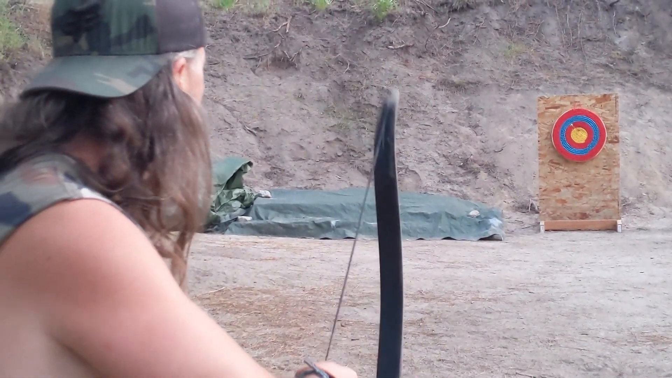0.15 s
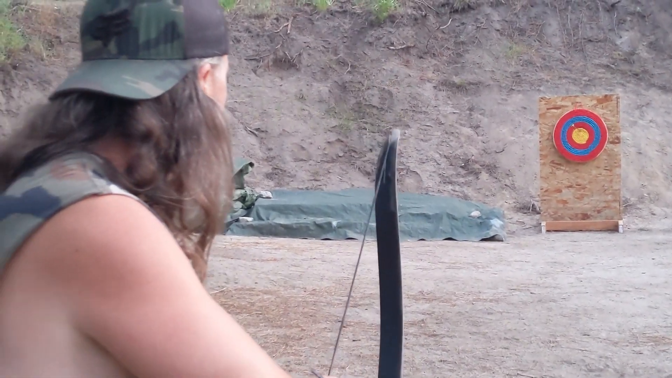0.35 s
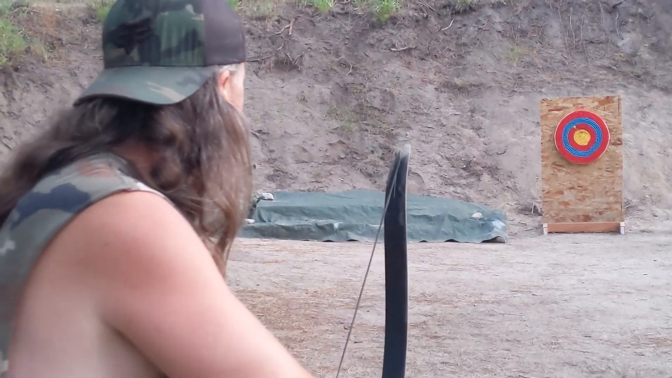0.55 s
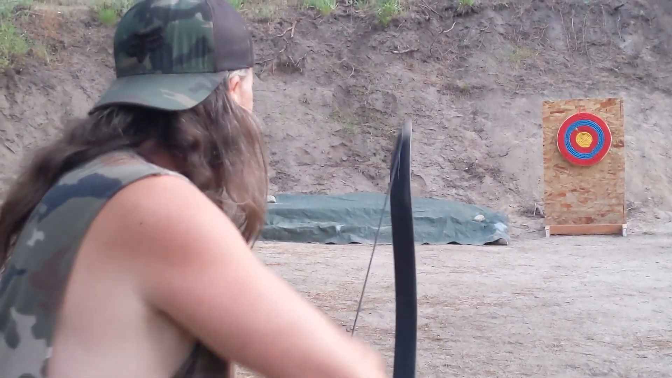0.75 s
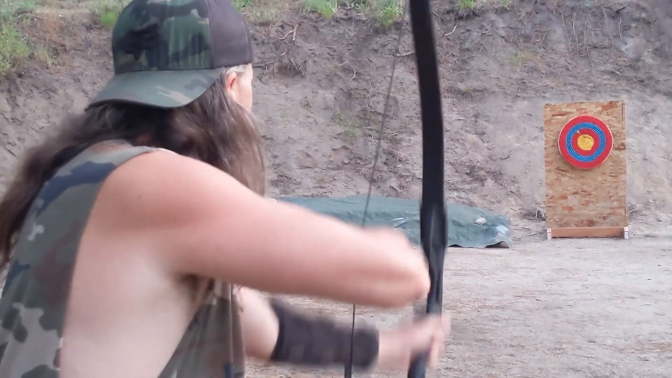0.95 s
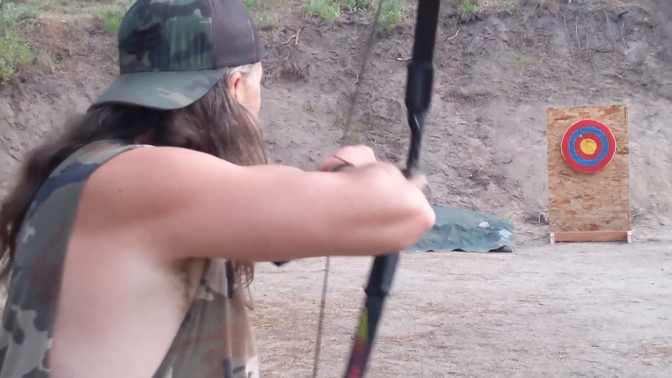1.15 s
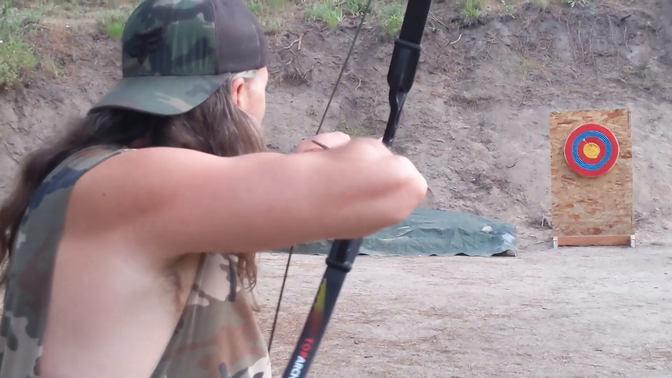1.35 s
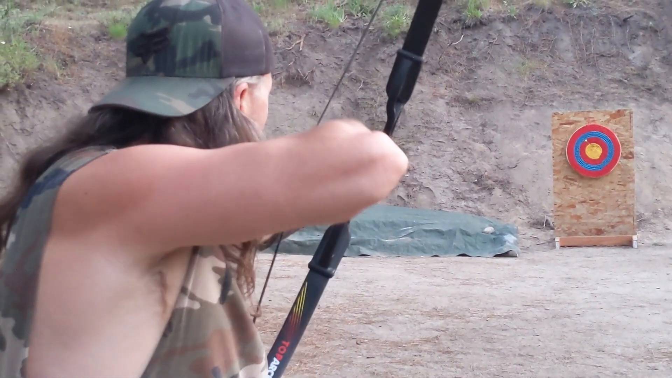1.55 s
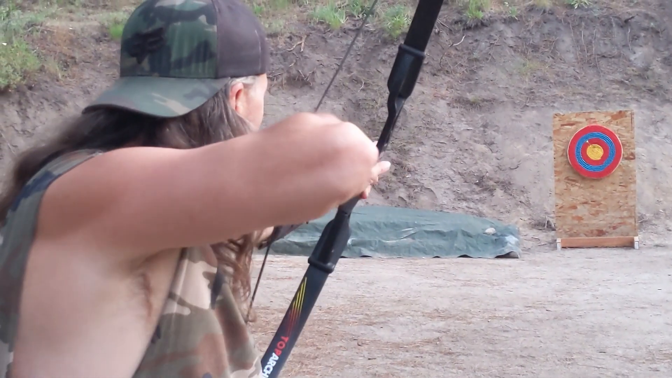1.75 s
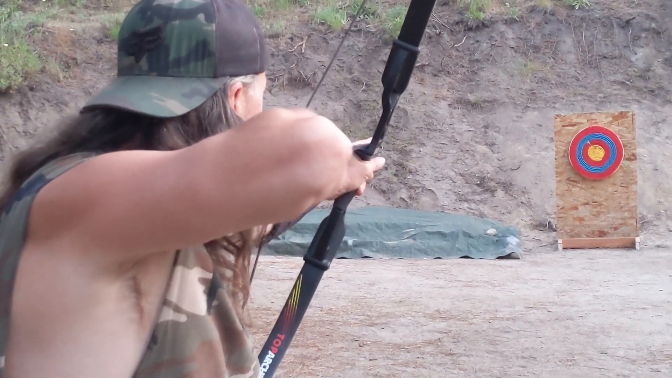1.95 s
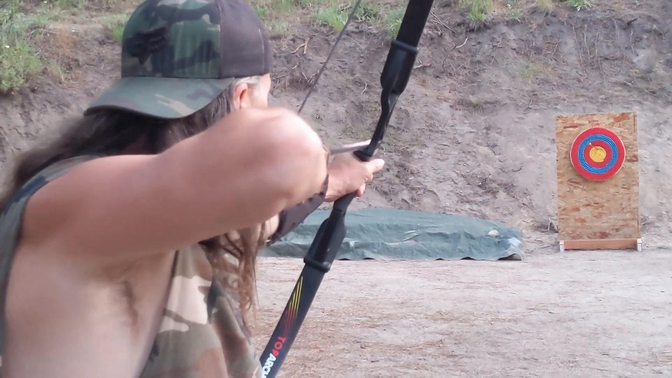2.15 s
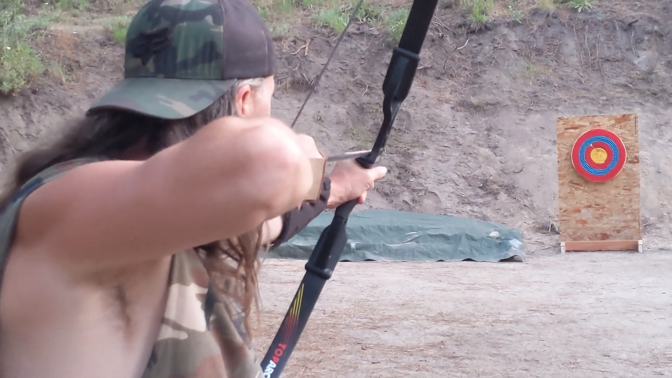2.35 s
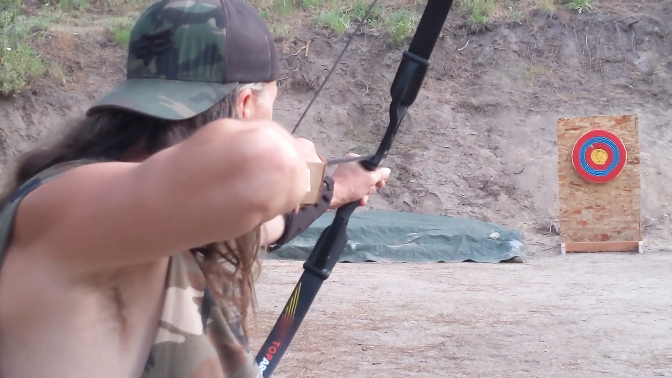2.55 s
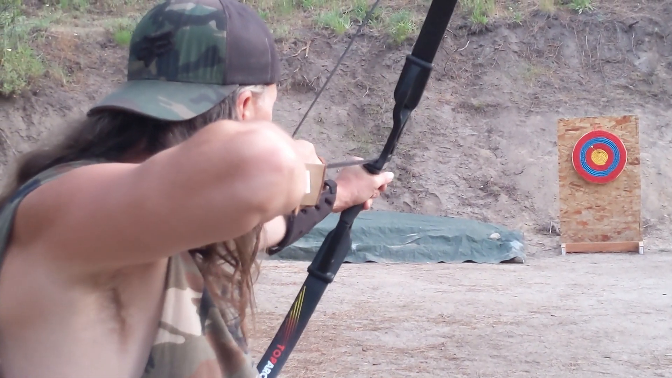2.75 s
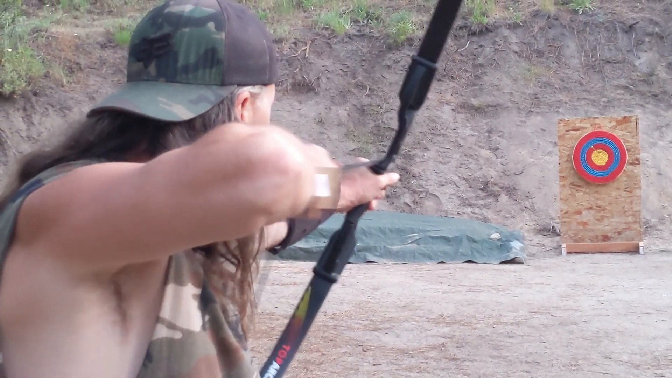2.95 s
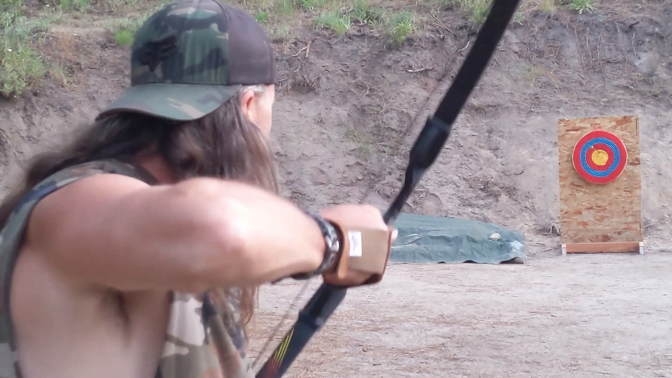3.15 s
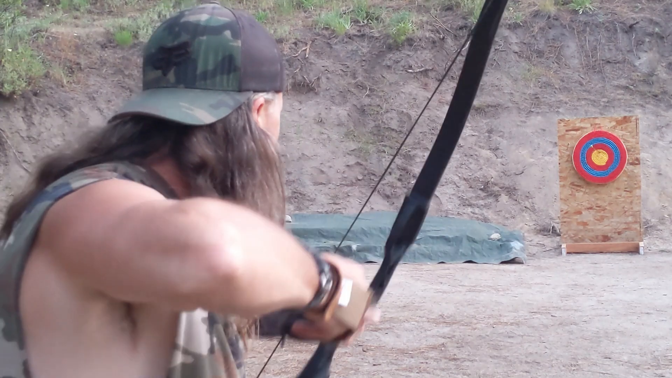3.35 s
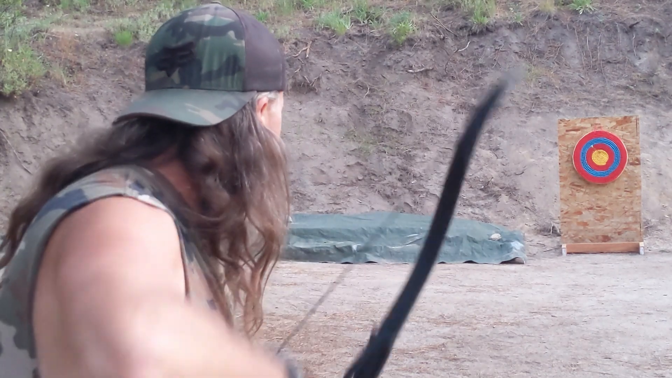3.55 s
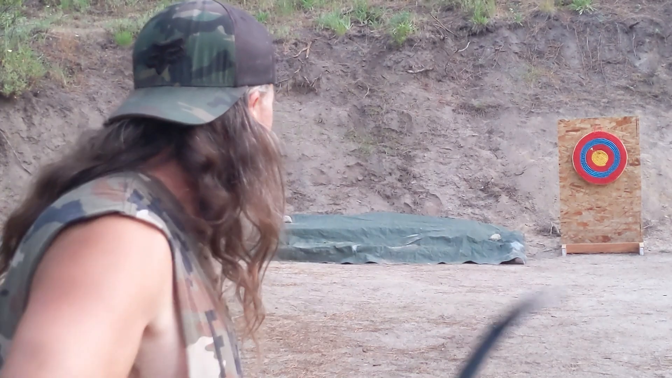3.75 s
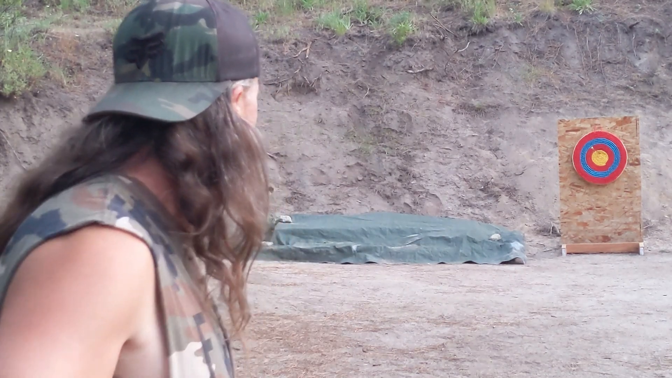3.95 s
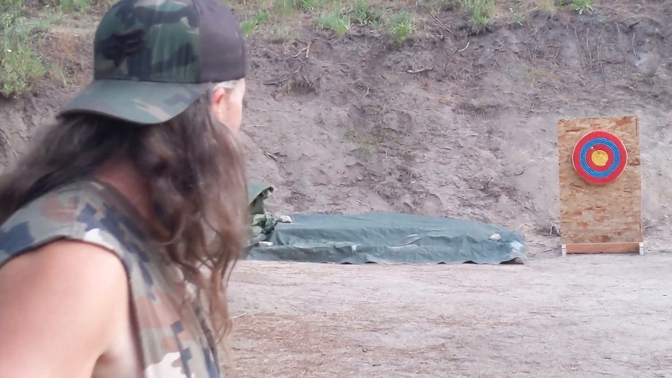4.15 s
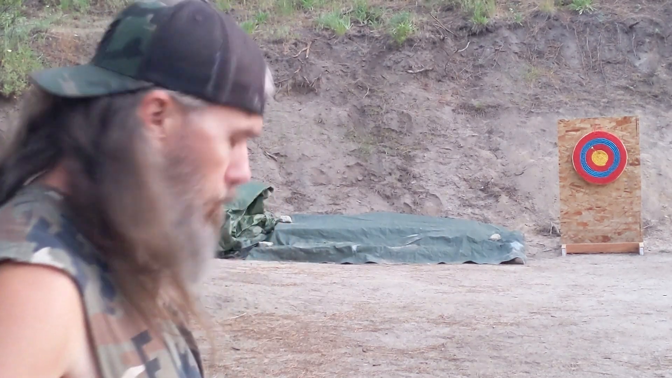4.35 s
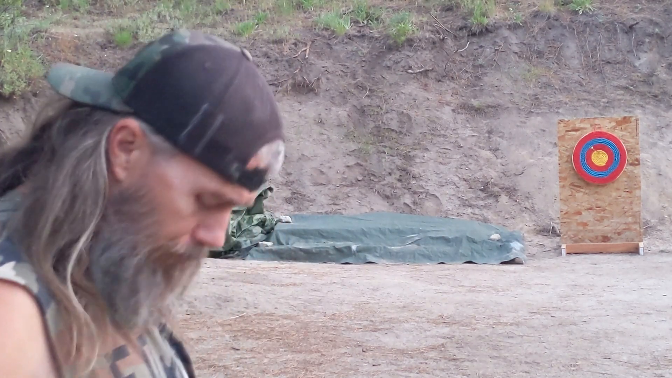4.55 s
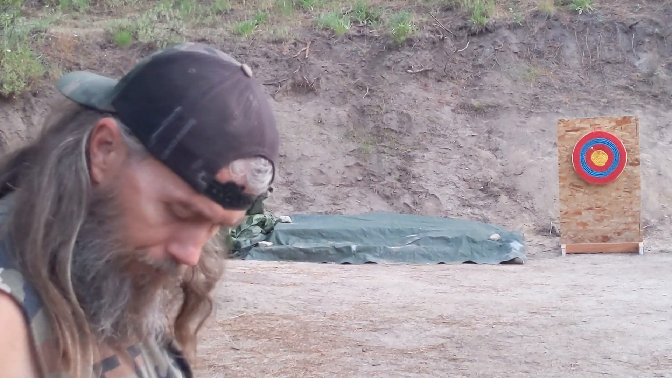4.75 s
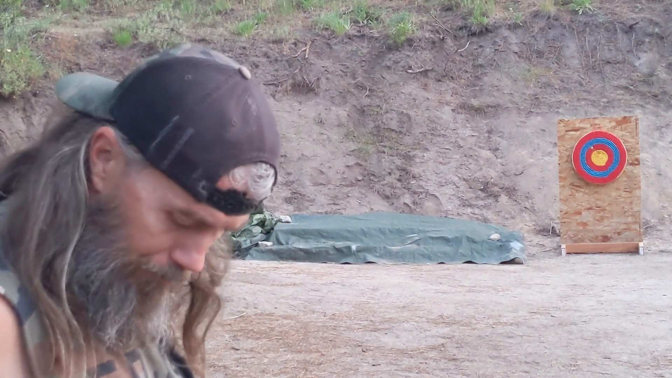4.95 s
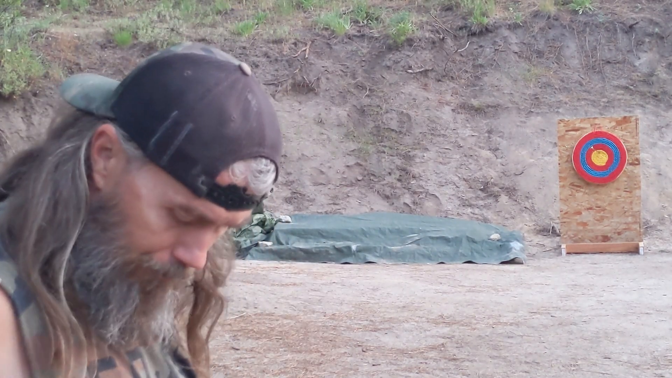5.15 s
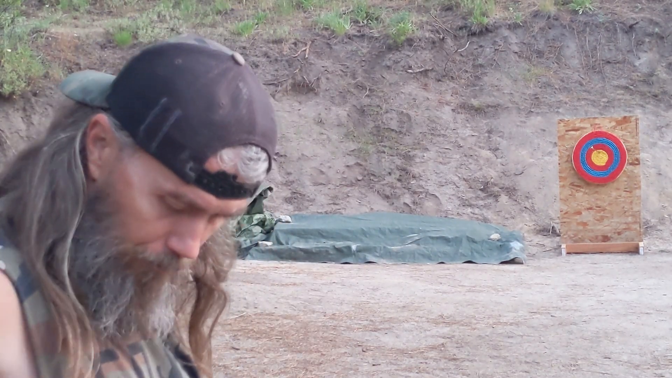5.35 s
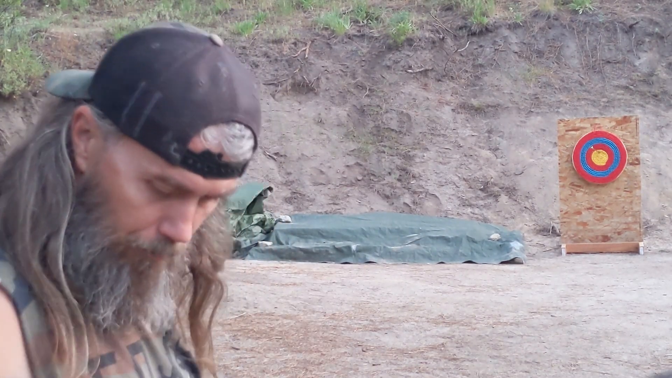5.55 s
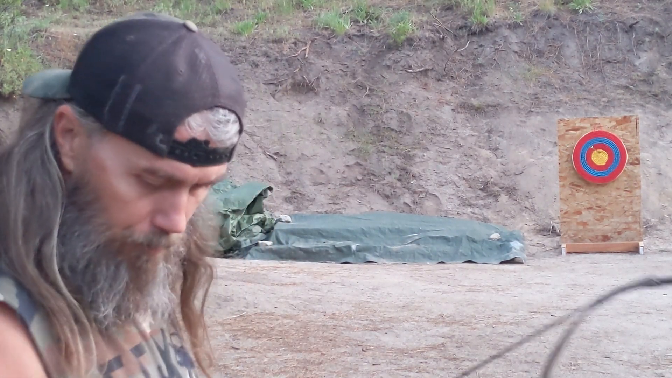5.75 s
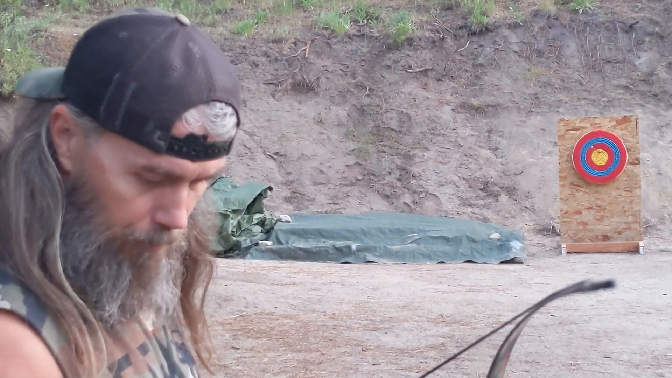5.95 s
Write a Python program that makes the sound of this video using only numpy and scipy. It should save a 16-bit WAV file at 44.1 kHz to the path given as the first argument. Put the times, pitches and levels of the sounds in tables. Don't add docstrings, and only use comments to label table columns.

```python
import sys
import numpy as np
from scipy import signal
from scipy.fft import rfft, irfft
from scipy.io import wavfile
from scipy.ndimage import uniform_filter1d, map_coordinates

SR = 44100
rng = np.random.default_rng(int(sys.argv[2]) if len(sys.argv) > 2 else 0)


def ratio(d):
    e = np.asarray(d, float) / 20
    return 10 ** e


def generate_wav(sig):
    pcm = np.round(np.clip(np.atleast_2d(sig).T, -1, 1) * 32767).astype(np.int16)
    wavfile.write(sys.argv[1], SR, pcm)


N = 264159
T, HZ = np.arange(N) / SR, np.fft.rfftfreq(N, 1 / SR)


def colour(x, points):
    hz, db = np.transpose(points)
    return irfft(rfft(x) * ratio(np.interp(np.log(HZ + 1), np.log(hz), db)), N)


def level(x, db):
    return x * ratio(db) / np.sqrt(np.mean(x ** 2))


def ring(x, hz, t60):
    pole = np.exp((2j * np.pi * hz - np.log(1000) / t60) / SR)
    return signal.lfilter([1], [1, -pole], x).imag


def band(x, hz, width):
    return ring(x, hz, np.log(1000) / (np.pi * width))


def clicks(s, size):
    return np.bincount(np.int_(np.asarray(s) * SR), size, N)


def walk(rate):
    hold = int(SR / rate)
    steps = np.repeat(rng.standard_normal(N // hold + 1), hold)
    return 1.07 * uniform_filter1d(uniform_filter1d(steps, hold), hold)[:N]


def noise(alike_hz):
    both, own = rfft(rng.standard_normal(N)), rfft(rng.standard_normal((2, N)))
    share = 1 / (1 + (HZ / alike_hz) ** 2)
    return irfft(np.sqrt(share) * both + np.sqrt(1 - share) * own, N)


def whistle(s, length, hz0, hz1, hz2, db):
    u = np.arange(int(length * SR)) / (length * SR)
    bend = np.polyfit([0, .5, 1], np.log([hz0, hz1, hz2]), deg=2)
    hz = np.exp(np.polyval(bend, u))
    envelope = np.clip(2.0 * np.sin(np.pi * u), 0, 1) ** 0.78
    tone = ratio(db) * envelope * np.sin(2 * np.pi * np.cumsum(hz) / SR)
    return np.pad(tone, (int(s * SR), N))[:N]


def swells(rows, rest_db):
    power = ratio(2 * rest_db)
    for s, length, db in rows:
        power = power + ratio(2 * db) * np.cos(np.pi * np.clip((T - s) / length, -.5, .5)) ** 2
    return np.sqrt(power)


# f/Hz, left minus right level/dB
SHADE = [(60, 1.5), (110, 1.5), (200, 2.5), (380, 4.5), (700, 5.0), (1290, 7.5), (2380, 7.5), (4400, 9.0),
         (8120, 8.0), (15000, 5.0)]
# f/Hz, phase/rad
PORT_LAG = [(20, .4), (60, .45), (130, .7), (240, 1.0), (400, 1.5), (740, 1.0), (1300, .4), (2200, .6),
            (3700, 2.5), (16000, 8.0)]


def ports(x, shade):
    left, right = x * np.ones((2, 1))
    half = np.array(SHADE) * [1, shade / 2]
    lag = np.interp(HZ, *np.transpose(PORT_LAG))
    late = irfft(rfft(left) * np.exp(-1j * lag), N)
    return np.array([colour(late, half), colour(right, half * [1, -1])])


# f/Hz, level per Hz/dB
WIND = [(13, -31), (22, 3.5), (39, -1.5), (134, -11), (161, -15.5), (200, -17.5), (285, -29.5), (400, -33),
        (520, -61.5), (880, -120)]
# t/s, rumble level/dB
GUSTS = [(0, -59.5), (.6, -59), (1.2, -59), (1.55, -60.5), (1.75, -58), (2.05, -59.5), (2.45, -62.5),
         (2.9, -58), (3.3, -59.5), (3.75, -62), (4.3, -62.5), (4.7, -63), (5.0, -62.5), (5.15, -58),
         (5.4, -64.5), (5.8, -59.5), (5.99, -64)]


def wind():
    rumble = level(colour(noise(270.0), WIND), 0.45)
    return rumble * ratio(np.interp(T, *np.transpose(GUSTS)) + 1.5 * walk(6.7))


# f/Hz, level per Hz/dB
FLOOR = [(150, -33), (260, -3.5), (450, -6.5), (1400, -14.5), (2000, -17.5), (3300, -12.5), (4600, -14),
         (5600, -12.5), (6500, -16.5), (7500, -12), (8500, -17), (9600, -18), (13000, -22.5), (15600, -18)]


def far_hiss():
    return level(colour(noise(630.0), FLOOR), -71.5) * ratio(0.18 * walk(5.9))


# middle t/s, length/s, peak level/dB
INSECTS = [(1.4, 0.76, -73), (1.9, 0.32, -76), (2.18, .3, -80), (2.85, 0.72, -85), (3.9, 0.72, -87),
           (5.2, .5, -84)]


def insects():
    chorus = level(band(band(noise(900.), 7500., 1300.), 7500., 1300.), .3)
    return chorus * swells(INSECTS, rest_db=-89.5) * ratio(2.5 * walk(30) + 2.0 * walk(9))


# f/Hz, width/Hz, level/dB
RUSTLE = [(2500, 400, -13.5), (3300, 900, -2.5), (4120, 550, -6.5), (5630, 620, 0.5), (6600, 1100, -3.5),
          (9400, 1000, 1), (11600, 830, -4.5), (14400, 2700, -7.5)]
# middle t/s, length/s, peak level/dB
CLOTH = [(.35, 0.27, -85), (.98, 0.76, -77), (1.45, .5, -83), (2.15, .4, -88.5), (3.05, 0.36, -81),
         (4.53, 0.26, -82.5), (5.15, .2, -80.5), (5.3, 0.26, -83)]


def cloth():
    rustle = 0
    for hz, width, db in RUSTLE:
        rustle += level(band(noise(830.0), hz, width), db) * ratio(3.4 * walk(14) + 1.5 * walk(300))
    return rustle * swells(CLOTH, rest_db=-87)


def creak():
    tone = level(band(rng.standard_normal(N), 141.4, 4.7), -67.5)
    return tone * np.interp(T, [2.62, 2.72, 2.93, 2.98], [0, 1, 1, 0])


def air():
    return ports(wind() + far_hiss() + insects() + cloth() + creak(), shade=0.58)


# first note t/s, gap/s, peak level/dB, fade to the last note/dB
TRILL = [
    (.1478, .058, -67, 3),
    (4.4955, .0588, -62.5, 7.5),
]


def trills():
    notes, loudest = 12, 5
    k = np.arange(notes)
    arch = np.interp(k, [0, loudest, k[-1]], [1, 0, 1]) ** 2
    out = 0
    for first, gap, peak_db, fade_db in TRILL:
        arch_db = arch * np.where(k < loudest, 2, fade_db)
        db = peak_db - arch_db + .6 * rng.standard_normal(notes)
        pitch = 1 + 0.0071 * rng.standard_normal(notes)
        for s, p, note_db in zip(first + gap * k, pitch, db):
            out += whistle(s - .003, 0.021, 4770 * p, 4400 * p, 3808 * p, note_db)
    return out


NOTES = {"held": [(.025, 0.08, 3510, -65.5), (4.38, 0.073, 3510, -65.5)], "sag": [(4.808, .055, 4040, -57)],
         "fall": [(1.06, .04, 4350, -75), (1.27, 0.058, 4480, -74), (1.495, .045, 4500, -72),
         (2.0, 0.042, 3720, -70.5)], "drop": [(1.362, .02, 5100, -68.5), (2.15, .045, 3460, -79.5),
         (4.852, 0.015, 3460, -74)], "swoop": [(1.712, 0.08, 4870, -66), (1.878, .07, 4860, -64),
         (2.345, .06, 3800, -78)], "arch": [(1.112, .04, 5820, -67.5), (1.56, .04, 5720, -63.5)],
         "lift": [(2.305, 0.044, 5170, -69.5), (4.845, .025, 2910, -75)], "rise": [(1.33, .02, 4530, -71),
         (2.04, 0.048, 4120, -74)]}
SHAPES = {"held": (.995, .99), "sag": (1.037, .963), "fall": (1.07, .84), "drop": (1.16, .81),
          "swoop": (1.44, .91), "arch": (.78, .86), "lift": (.965, 1.035), "rise": (.84, 1.28)}


def near_birds():
    near = trills()
    for shape, (start, end) in SHAPES.items():
        for s, length, hz, db in NOTES[shape]:
            near += whistle(s, length, start * hz, hz, end * hz, db)
    delay_s = 3e-5 * walk(150)
    return map_coordinates(near, [(T + delay_s) * SR])


# call rate/(1/s), chips a call, f/Hz, share heard direct
CHATTER = [(17.1, 3, 5800, .8), (26.2, 1, 5700, .75), (23.1, 1, 3900, .7), (23.1, 1, 5050, .5),
           (14, 3, 5600, .5), (30, 3, 5600, .1), (20, 2, 5600, 1), (26.2, 3, 3600, .6), (30, 3, 3300, .2),
           (30, 3, 4100, .3), (20, 3, 3800, .7)]
# start t/s, end t/s, first level/dB, last level/dB
BOUTS = [(4.462, 5.1, -68, -71.5), (5.114, 5.6, -67.5, -68), (2.866, 3.42, -67, -67),
         (2.9, 3.42, -73, -73.5), (.8, 1.08, -70, -71), (2.06, 2.55, -73, -75), (1.34, 1.35, -63, -64),
         (4.88, 5.55, -65, -73.5), (1.97, 2.06, -70, -76), (2.22, 2.28, -70.5, -74.5),
         (2.836, 2.84, -67, -67)]


def chatter():
    direct, far = 0, 0
    for (rate, chips, hz, share), (s0, s1, *ends_db) in zip(CHATTER, BOUTS):
        starts = np.arange(s0, s1, 1 / rate)
        scatter = rng.standard_normal((2, len(starts), 3))
        db = np.interp(starts, [s0, s1], ends_db)[:, None] + 1.504 * scatter[0]
        pitch = hz * (1 + .06 * (1.1 - share) * scatter[1])
        calls = 0
        for s, row, f in zip(starts, db, pitch):
            for k in range(chips):
                calls += whistle(s + .0095 * k, .006, 1.09 * f[k], f[k], .92 * f[k], row[k])
        direct = direct + share * calls
        far = far + (1.2 - share) * calls
    return direct, far


def birds():
    near = near_birds()
    direct, far = chatter()
    t = T[:SR // 2]
    echo = 0
    for x, t60, loss_db in ((near, .8, 43), (far, .35, 31)):
        leaves = rng.standard_normal(len(t)) * ratio(-60 * t / t60 - loss_db)
        echo += signal.fftconvolve(x, leaves)[:N]
    return ((near + direct) * ratio(2.2 * walk(120)) + echo) * ratio([[3.0], [-9]])


# t/s, motor steps
LENS_RUNS = [
    (.302, 21),
    (1.901, 21),
    (5.101, 21),
]
# f/Hz, width/Hz, level/dB
LENS_BODY = [(6050, 220, -6.5), (7500, 310, 0), (9620, 530, 4.5), (10500, 900, -1), (11200, 1300, -8.5),
             (15340, 500, 1)]


def lens():
    checks = np.arange(.2921, T[-1], .32001)
    settles = np.array([s + .15 for s, _ in LENS_RUNS])
    times = np.r_[checks, settles]
    db = np.r_[-59.5 + 0 * checks, -60 + 0 * settles] + .7 * rng.standard_normal(len(times))
    steps = sum(clicks(times + late, ratio(db)) for late in (0.00033, 0.0038))
    for s, n in LENS_RUNS:
        steps += clicks(s + np.arange(n) / 200, ratio(-61 + 1.2 * rng.standard_normal(n)))
    body = sum(ratio(gain_db) * band(steps, hz, width) for hz, width, gain_db in LENS_BODY)
    return body * ratio([[1.0], [-22]])


# t/s, peak level/dB,
# ring f/Hz, width/Hz, ticks
KNOCKS = [(2.89, -64.5, 714, 150, 2), (3.0, -60.5, 5000, 6000, 2), (3.7916, -42.5, 706, 1000, 1),
          (3.797, -48, 600, 800, 1), (3.791, -40, 2400, 2591, 1), (4.096, -56.5, 2360, 900, 7),
          (4.704, -46.5, 7500, 3000, 2), (5.232, -60, 6900, 901, 2)]


def knocks():
    out = 0
    for s, db, hz, width, ticks in KNOCKS:
        n = round(ticks)
        late, scatter = rng.standard_normal((2, n))
        times = s + 0.0033 * (np.arange(n) + .2 * late)
        out += band(clicks(times, ratio(db + 1.2 * scatter)), hz, width)
    return out


# t/s, scrape level/dB, limb rattle level/dB
SCRAPE = [(3.063, -59, -78), (3.071, -45, -56), (3.085, -40.5, -57), (3.096, -36, -34.5),
          (3.108, -32.5, -25), (3.119, -34.5, -37.5), (3.13, -41.5, -39), (3.15, -52, -49),
          (3.3, -78.5, -78)]
# f/Hz, level per Hz/dB
SCRAPE_TONE = [(1060, -12), (1800, -6.5), (2060, -16.5), (2240, -4), (3110, -5.5), (3460, -1.5),
               (4630, -13.5), (5210, -2), (6310, -11.5), (7640, -8), (8440, -13), (11600, -11.5),
               (15800, -23)]
# f/Hz, level per Hz/dB
RATTLE_TONE = [(88, -36), (150, -6.5), (260, -5.5), (370, 3), (488, -2.5), (866, -0.5), (1150, -18),
               (1400, -8), (2080, -18.5), (2200, -25), (2860, -25), (4840, -120)]
# t/s, peak level/dB, ring f/Hz
CATCH = [(3.0677, -43, 2610), (3.0685, -43.5, 4900), (3.0765, -36, 7700), (3.082, -33.5, 2720),
         (3.0854, -21.5, 7120), (3.0914, -38.5, 5760), (3.0973, -26.5, 1800), (3.1041, -31.5, 2237),
         (3.107, -28.5, 3500), (3.1183, -33.5, 5350), (3.1324, -28.5, 3530), (3.22, -46, 4120)]
# f/Hz, level/dB, t60/s
LIMBS = [(135, -33.5, 0.13), (146, -48, 1.1), (159, -53, 1), (238, -40.5, 0.21), (386, -40, 0.25),
         (414, -49.5, 0.16), (471, -49.5, 0.106), (650, -44, .3), (850, -45, .1)]
# t/s, length/s, start f/Hz, middle f/Hz, end f/Hz, level/dB
TWANG = (3.318, .028, 650, 652, 645, -67)


def release():
    s, scrape_db, rattle_db = np.transpose(SCRAPE)
    on = (T > s[0]) & (T < s[-1])
    grit = ratio(3.0 * walk(500))
    scrape = level(colour(noise(4550.0) * grit, SCRAPE_TONE), -2.43)
    scrape = scrape * ratio(np.interp(T, s, scrape_db)) * on
    rattle = level(colour(noise(4000.), RATTLE_TONE), -1.5)
    rattle = rattle * ratio(np.interp(T, s, rattle_db) + 1.5 * walk(200)) * on
    catches = sum(band(clicks([c], [ratio(db - 0.5)]), hz, 500.) for c, db, hz in CATCH)
    stop = uniform_filter1d(clicks([3.092], [-1.]), size=30)
    limbs = sum(ratio(db) * ring(stop, hz, t60) for hz, db, t60 in LIMBS)
    hum = limbs * ratio(1.5 * walk(30))
    return scrape + rattle + catches + whistle(*TWANG) + hum


# f/Hz, level/dB, t60/s
BANK = [(85, -44, 0.59), (123.6, -40, 0.44), (191.7, -39.5, .4), (328, -53, 0.83), (664, -56, 0.81),
        (1116, -52, 0.55), (1600, -56, .3), (3050, -51, 0.39), (3300, -58.5, 1.07), (3800, -48.5, 0.5),
        (5360, -56, 0.34), (7240, -54, .35), (9800, -58.5, .35), (13530, -64, .3)]


def bank(s, db, lows_late):
    t, out = np.clip(T - s, 0, 9), 0
    for hz, gain_db, t60 in BANK:
        width = 0.37 * hz
        scatter = level(band(band(noise(1500.), hz, width), hz, width), gain_db + db)
        rise = 1 - np.exp(-t / (lows_late / hz))
        grain_db = 1.3 * walk(40) + 2.39 * walk(min(hz / 12, 250))
        out += scatter * rise * ratio(-60 * t / t60 + grain_db)
    return out


# f/Hz, level/dB, t60/s
BOARD = [(198.5, -30, .1), (248.3, -20, 0.053), (364.4, -34.5, 0.11), (465, -39, 0.13), (743, -24.5, 0.055),
         (875, -24, 0.064), (1080, -27.5, .04), (1440, -26, 0.015), (1565, -30.5, 0.0255)]
# delay t/s, level/dB
SLAPS = [(.028, -15.5), (.04, -14.5), (.065, -16.5), (.086, -13.5), (.107, -21.5), (0.129, -24.5),
         (.18, -30)]
# t/s, length/s, start f/Hz, middle f/Hz, end f/Hz, level/dB
SWAY = (3.415, .07, 68, 86, 115, -40)
# f/Hz, level/dB, t60/s
SHAFT = [(2900, -4, .008), (3650, 0, .009), (4500, -8, .008), (5300, -9, .009), (9600, -13, .007)]


def impact():
    hit_s = 3.4078
    splinters = clicks([3.4079, 3.4086, 3.4092, 3.4099], [-0.5, 0.66, 0.72, 0.32])
    board = sum(ratio(db) * ring(splinters, hz, t60) for hz, db, t60 in BOARD)
    board = signal.sosfilt(signal.butter(2, 150., "high", fs=SR, output="sos"), board)
    dull = signal.sosfilt(signal.butter(2, 400., fs=SR, output="sos"), board)
    slaps = sum(ratio(db) * np.roll(dull, int(late * SR)) for late, db in SLAPS)
    shaft = sum(ratio(db - 16.0) * ring(splinters, hz, t60) for hz, db, t60 in SHAFT)
    t = T - hit_s
    crack = noise(4400.0) * (t > 0) * ratio(-32.5 - 60 * np.clip(t - .003, 0, 1) / 0.016)
    blow = board + slaps + whistle(*SWAY) + shaft
    return blow + colour(crack, SCRAPE_TONE) + bank(hit_s, db=4.0, lows_late=4.0)


def scene():
    return air() + birds() + lens() + ports(knocks() + release() + impact(), shade=1)


def band_limit(x):
    return signal.sosfilt(signal.butter(12, 15830, fs=SR, output="sos"), x)


def record(dry):
    return band_limit(dry)


dry = scene()
out = record(dry)
generate_wav(out)
```